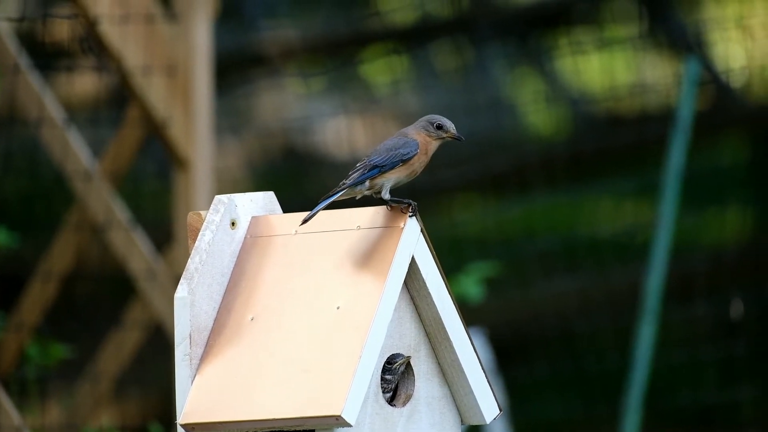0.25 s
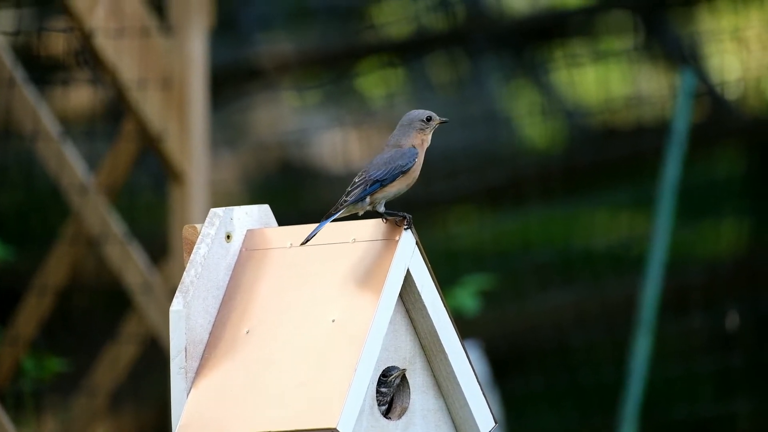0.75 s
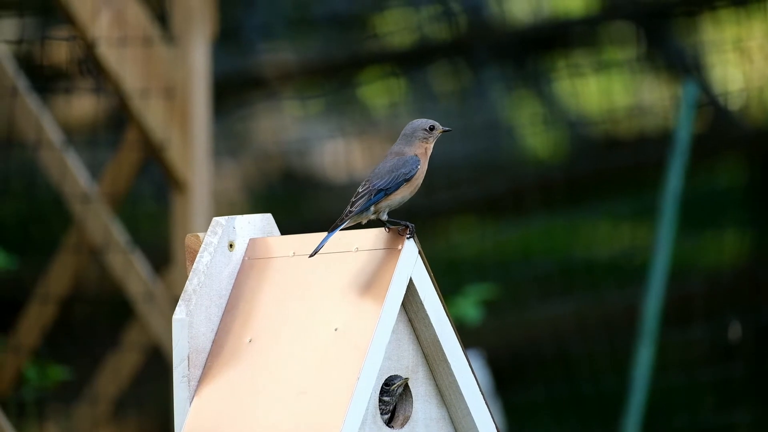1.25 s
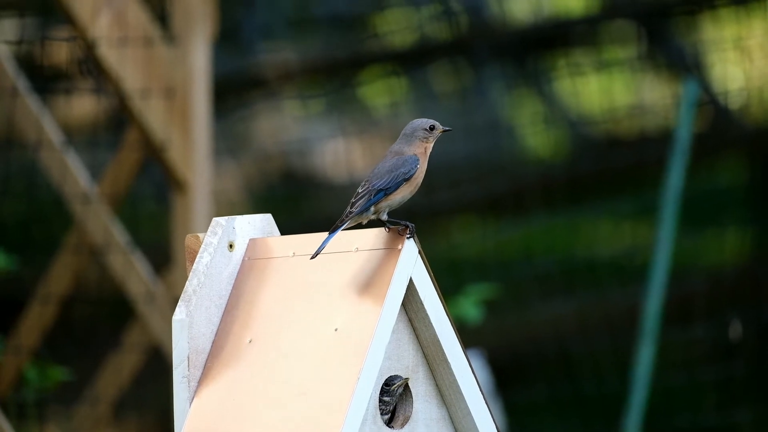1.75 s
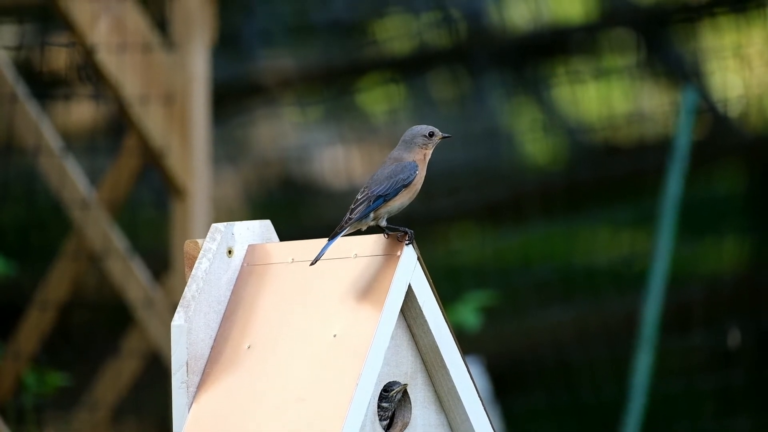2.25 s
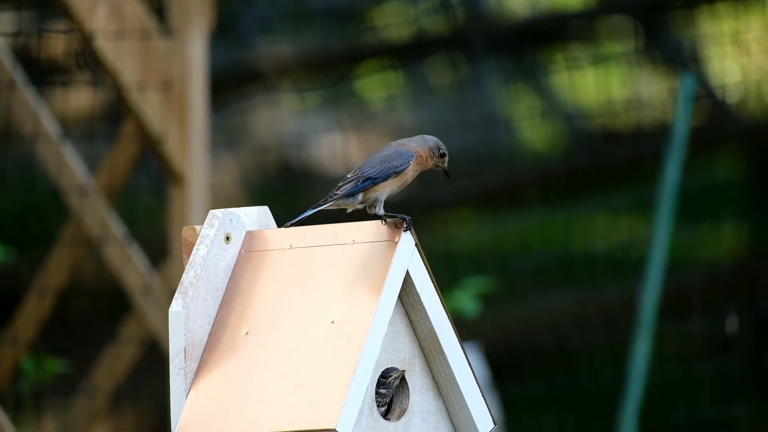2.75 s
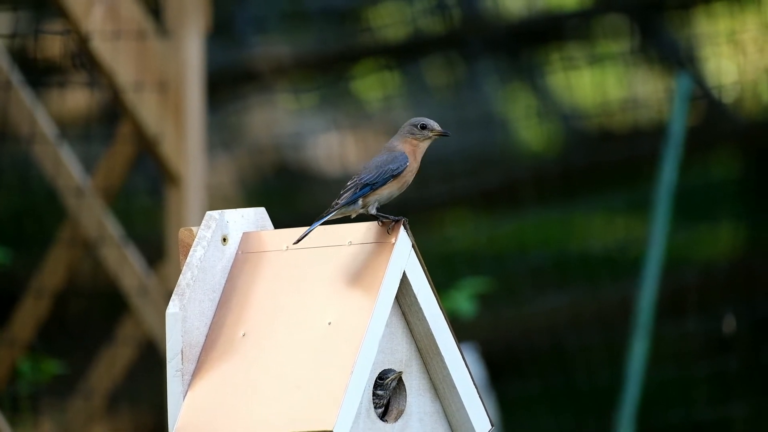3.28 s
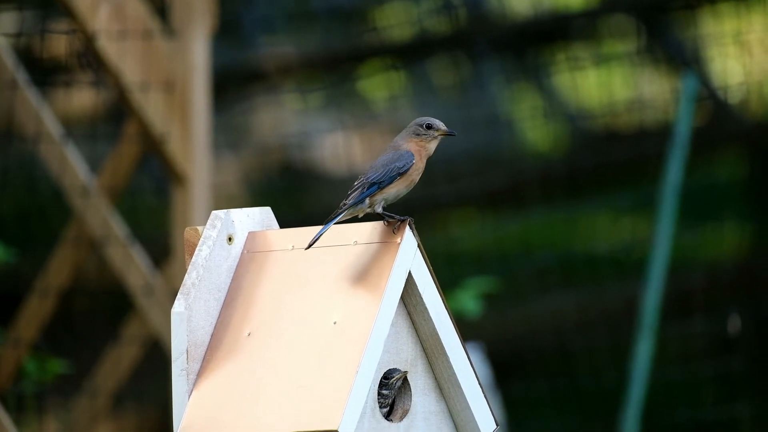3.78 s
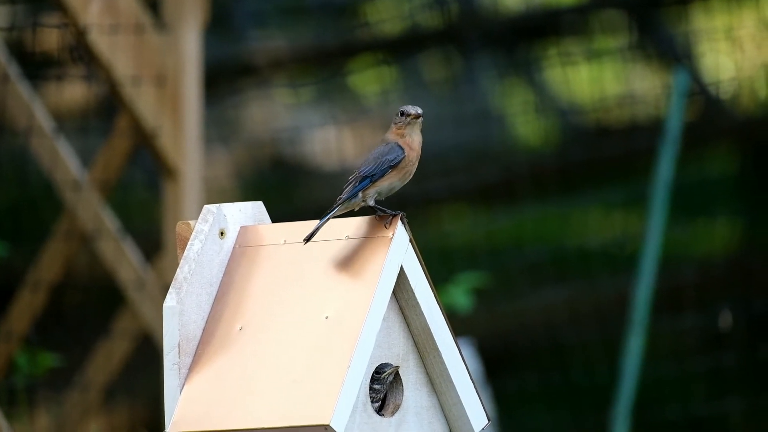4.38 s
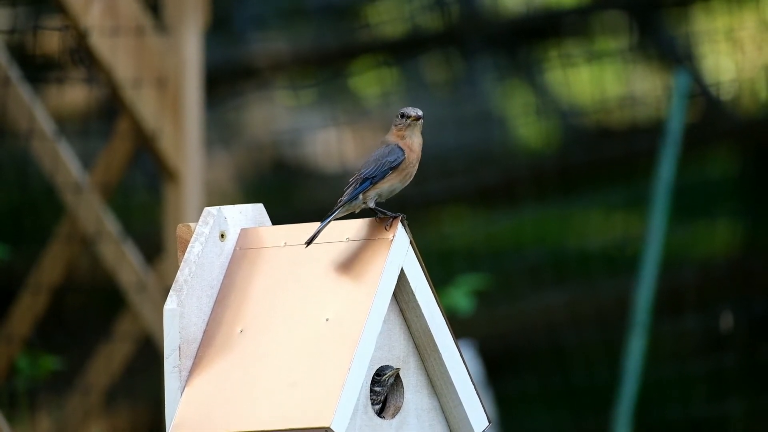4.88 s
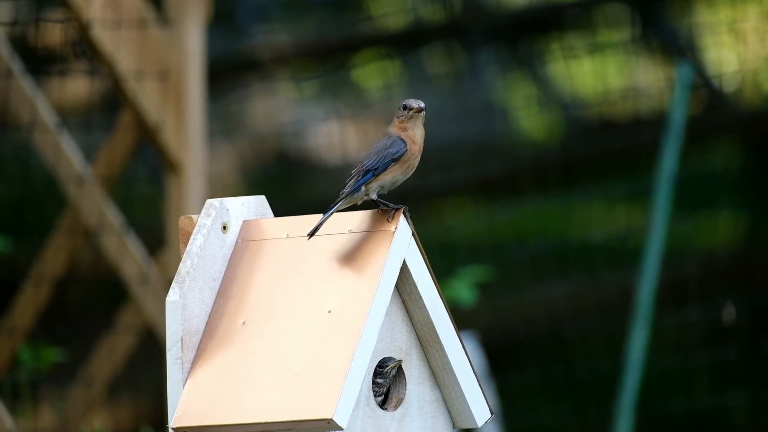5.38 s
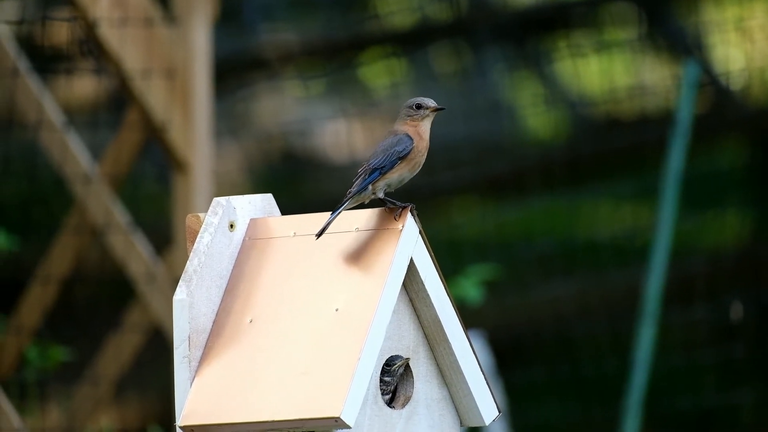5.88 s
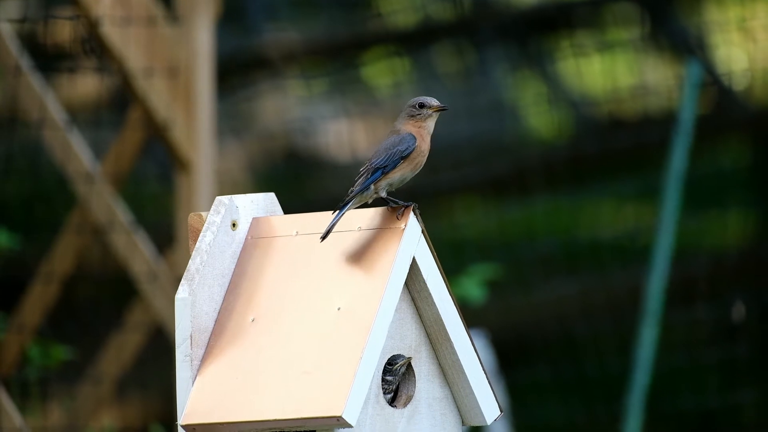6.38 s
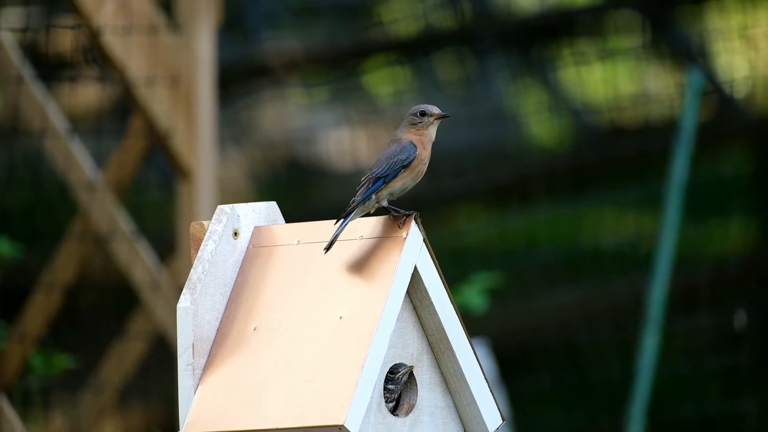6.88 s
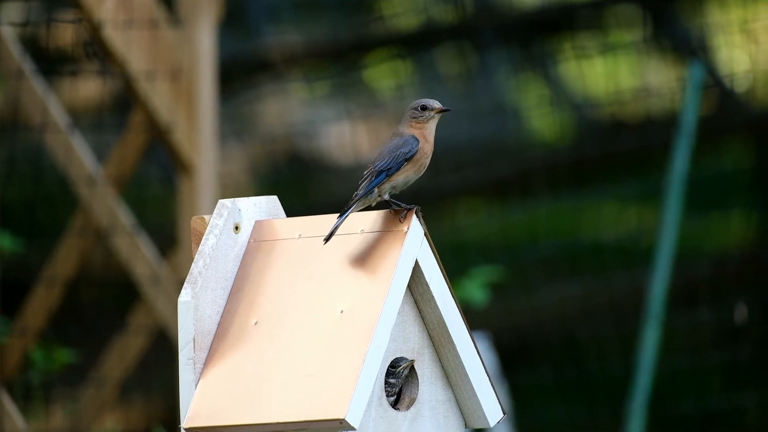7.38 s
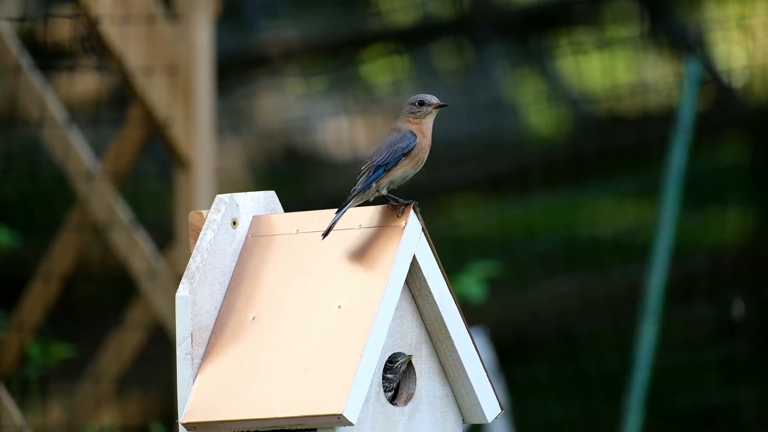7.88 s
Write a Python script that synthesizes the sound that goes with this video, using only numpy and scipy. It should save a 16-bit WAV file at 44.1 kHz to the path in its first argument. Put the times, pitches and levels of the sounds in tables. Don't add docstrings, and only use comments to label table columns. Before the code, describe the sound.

A small bluebird perched on a nest box opens with two harsh chucks and a strong falling whistle, then a soft broken reply. A sharp chip, more chucks and a lone whistle follow after gaps. The camera casing ticks twice, then a final run of chucks and fluttering whistles ends with a chip and faint knocks. Low traffic, air hiss and distant birds fill the leafy yard, heard through a handheld stereo microphone.

```python
import sys
import numpy as np
from scipy import signal
from scipy.fft import rfft, irfft, next_fast_len
from scipy.io import wavfile
from scipy.ndimage import uniform_filter1d, map_coordinates

SR = 44100
rng = np.random.default_rng(int(sys.argv[2]) if len(sys.argv) > 2 else 0)


def gain_from_db(level_db):
    decades = np.asarray(level_db, float) / 20
    return 10 ** decades


def generate_wav(signal):
    frames = np.transpose(np.atleast_2d(signal))
    scaled = np.clip(frames, -1, 1) * 32767
    pcm = np.round(scaled).astype(np.int16)
    wavfile.write(sys.argv[1], SR, pcm)


N = 358974
T = np.arange(N) / SR

# time [s], hum level [dB].
TRAFFIC = [(0.0, -51), (0.43, -55.5), (1.36, -51), (1.92, -52.5), (2.45, -49.5), (3.99, -51), (4.71, -43.5),
           (4.92, -48), (5.87, -50), (6.53, -48), (6.76, -51), (8.14, -50)]
# time [s], rumble gain [dB].
LORRIES = [
    (2.9, 2),
    (4.85, 2.5),
    (5.95, 5),
    (7.9, 5.5),
]
# frequency [Hz], level [dB per Hz].
RUMBLE = [(8.8, -61), (15, -16.5), (54, -1.5), (70, 2.5), (97, -7.5), (120, -9), (160, -57.5), (260, -120)]
# frequency [Hz], level [dB per Hz].
HUM = [(59, -50.5), (100, -3.5), (189, 2.5), (236, -3.5), (291, -12), (330, -30.5), (430, -23.5),
       (730, -120)]
# frequency [Hz], level [dB per Hz].
AIR = [(160, -37), (280, -2.5), (373, -2), (504, -5), (683, -9.5), (808, -7), (1110, -11.5), (1290, -13.5),
       (1780, -17), (2600, -18.5), (4500, -24.5), (5220, -26), (6080, -31.5), (15600, -43.5)]
# frequency [Hz], level [dB per Hz].
RUSTLE = [(2200, -40), (3000, 1), (4600, -3), (6000, -40)]
# frequency [Hz], left-right likeness [0 to 1].
ALIKE = [(25, 0.97), (60, 0.89), (130, 0.98), (290, 0.96), (640, 0.77), (1410, 0.3), (3100, 0.04),
         (6820, 0.057), (15000, 0.26)]
# frequency [Hz], time to fall 60 dB [s].
YARD = [(800, 0.22), (2500, 0.66), (7000, 0.56), (14000, 0.38)]

# start [s], peak level [dB], pitch [Hz].
THUDS = [
    (7.686, -37.5, 770),
    (7.743, -43, 1150),
    (7.888, -48, 850),
]
# start [s], length [s], level [dB].
DROPS = [
    (4.447, 0.032, -56),
    (5.433, 0.046, -62),
    (7.592, 0.077, -66),
    (7.628, 0.069, -58),
    (7.915, 0.055, -63),
    (7.955, 0.064, -54),
]
# start [s], level [dB].
TSEEPS = [
    (2.181, -68),
    (2.509, -69),
    (2.626, -62.5),
    (7.888, -71),
]
# start [s], level [dB].
PEEPS = [
    (2.13, -73),
    (3.24, -71),
    (4.35, -73),
    (5.39, -71.5),
    (6.384, -72),
]
# start [s], start pitch [Hz], level [dB].
WISPS = [
    (.18, 8000, -77),
    (5.94, 8470, -80),
    (7.1, 7900, -83),
]
# start [s], length [s], pitch [Hz], level [dB], pan [dB].
HELD = [(0.126, 0.032, 3090, -63.5, 1), (0.216, 0.024, 2444, -56, -5), (1.763, 0.036, 2570, -68, -2),
        (1.8, 0.03, 2340, -68, 5), (1.964, .02, 2770, -67, -1), (2.006, 0.13, 2270, -65, 1),
        (4.18, 0.036, 3750, -69, 2), (4.213, 0.085, 3540, -63, 0), (4.794, 0.083, 3970, -70, -6),
        (4.83, 0.023, 3010, -65, 0), (4.864, 0.013, 3500, -63.5, 0), (0.536, 0.05, 11400, -74, -4),
        (4.93, 0.024, 2410, -63, -5), (4.952, 0.016, 2990, -63, -2), (5.14, 0.029, 3360, -74, 0),
        (5.453, 0.15, 4370, -76.5, -6), (5.617, 0.077, 4360, -83, -3), (6.205, .035, 2307, -59, -1.5),
        (5.73, 0.053, 4170, -67, -7), (5.849, 0.097, 4130, -65.5, -3), (5.974, 0.032, 3150, -70, 9)]
# start [s], length [s], start pitch [Hz], end pitch [Hz], level [dB].
STROKES = [(0.095, 0.11, 4010, 3490, -70), (0.618, 0.035, 7000, 6350, -68), (0.655, 0.12, 6330, 6530, -63),
           (0.775, 0.07, 6600, 7000, -67), (1.949, 0.045, 6670, 5700, -67), (1.694, 0.043, 2750, 2426, -68),
           (1.85, 0.024, 2310, 2140, -68), (1.978, 0.02, 2730, 2400, -68), (2.156, 0.013, 2340, 3300, -63),
           (2.26, 0.043, 1890, 2700, -71), (2.379, 0.038, 2040, 2450, -66), (2.44, 0.041, 2330, 2130, -69),
           (2.504, 0.031, 2170, 2680, -66), (3.664, 0.024, 2100, 2290, -69),
           (3.688, 0.045, 2410, 2850, -60.5), (3.739, 0.017, 3170, 2810, -57),
           (4.239, 0.038, 2760, 2580, -63), (4.27, 0.13, 2550, 2270, -57.5),
           (4.88, 0.11, 3090, 3230, -70.5), (5.01, 0.11, 3265, 3240, -69.5),
           (5.471, 0.017, 3020, 2850, -56.5), (.16, 0.1, 3660, 3610, -74), (7.164, 0.019, 2010, 1690, -65),
           (7.25, 0.018, 1810, 2020, -70), (4.413, 0.048, 3380, 3050, -57.5),
           (5.566, 0.017, 2800, 3040, -58), (5.585, 0.012, 3060, 3460, -48.5),
           (5.593, 0.01, 3450, 3900, -63), (5.609, 0.014, 2500, 2410, -57), (5.62, 0.027, 2400, 3430, -57),
           (5.655, 0.019, 2480, 2560, -59), (5.673, 0.013, 2700, 3050, -56), (3.93, 0.017, 3100, 3230, -57),
           (3.962, 0.015, 3250, 3420, -64), (6.123, 0.033, 2330, 2670, -53.5),
           (6.147, .07, 2570, 2310, -63.5), (7.008, 0.059, 3210, 3020, -66),
           (7.289, 0.038, 3600, 3160, -70), (7.324, 0.047, 3150, 3000, -60.5)]

# start [s], level [dB], low ending level [dB], stretch [times].
SLURS = [
    (6.012, -71.5, -74, 1.24),
    (6.335, -71, -76, 1.2),
    (6.66, -69, -74, 1),
    (6.994, -70.5, -85, 0.99),
    (7.32, -69, -68, 1.02),
    (7.649, -67.5, -63, 0.95),
    (7.98, -69.5, -78, 0.96),
]
# time [s], pitch [Hz], level [dB].
SLUR = [(0, 6720, -9), (.03, 4594, 2), (.06, 3860, 9), (.115, 3200, 9.5), (.15, 2960, -4)]
# time [s], pitch [Hz], level [dB].
ENDING = [(.153, 2550, 0), (.175, 1780, 2), (.2, 1520, -2), (.235, 1490, 1), (.29, 1800, 3)]
# time of lowest pitch [s], drop [s], lowest pitch [Hz], climb [s], level [dB].
SCOOPS = [
    (4.775, 0.0041, 1697, 0.29, -64),
    (5.541, 0.072, 1702, .28, -60.5),
    (6.097, .055, 2230, 0.032, -59),
]
# share of the time [0 to 1], share of the rise [0 to 1], level [dB].
CLIMB = [(0, 0, -3), (.33, .25, 4), (.5, .35, -1), (.72, .62, -2), (.86, .84, 3), (.95, .96, 7), (1, 1, 4)]
# start [s], peak level [dB], pitch [Hz], pan [dB].
HOOTS = [
    (0.17, -56, 832, -4.5),
    (0.475, -53.5, 902, -2),
    (0.805, -54.5, 898, -4),
    (0.861, -60, 780, -8),
    (0.992, -55.5, 793, -8),
    (6.575, -56, 822, -5.5),
    (6.81, -53, 885, -4),
]
# start [s], length [s], lowest pitch [Hz], end pitch [Hz], level [dB].
HOOKS = [
    (0.376, 0.1, 7200, 9300, -61.5),
    (0.575, 0.12, 7450, 8500, -70),
    (0.838, 0.068, 7450, 8400, -60),
    (1.343, 0.064, 6920, 8650, -58.5),
    (1.626, 0.05, 7160, 7800, -75),
    (1.919, 0.063, 7000, 8600, -54),
    (2.447, 0.068, 7500, 8640, -69),
    (3.409, 0.11, 7100, 10200, -53.5),
    (5.099, 0.11, 6900, 9800, -58.5),
    (6.874, 0.11, 7020, 9970, -53),
]

# start [s], peak level [dB], brightness [dB].
TICKS = [
    (5.054, -36, 24),
    (5.218, -23, -13),
]
# frequency [Hz], width [Hz], level [dB].
CASING = [(330, 470, 15), (750, 200, 0), (1530, 4900, 13.5), (5400, 1400, 7), (7500, 1600, 1),
          (11700, 3000, -14.5)]

# start [s], level [dB], start pitch [Hz], end pitch [Hz], pan [dB].
CHIPS = [
    (1.705, -39.5, 4900, 9160, 0),
    (4.05, -39.5, 5240, 8690, 0.5),
    (7.329, -38.5, 5120, 8540, 1),
]
# time of highest pitch [s], level [dB], highest pulse rate [Hz], half length [s].
CHUCKS = [
    (0.331, -34.5, 920, 0.021),
    (0.4, -34.5, 1046, 0.021),
    (2.71, -38, 902, 0.02),
    (2.766, -34.5, 1066, 0.019),
    (3.317, -38, 884, .022),
    (6.255, -35, 938, 0.023),
    (6.352, -32, 1136, 0.019),
]
# frequency [Hz], level [dB].
THROAT = [(1200, -25), (1750, -5.5), (2350, -3), (2800, 3.5), (3600, -1), (5000, -11.5), (6200, -31.5),
          (8000, -32.5), (11000, -30.5), (13500, -69.5)]
ORDER_DB = [-23.5, -11.5, -1.5, -3, -2, 2.5, 3.5, -1, -4]

# time [s], level [dB].
WHISTLES = [
    [(.505, -57), (.515, -53), (.538, -30.5), (.569, -27.5), (.636, -34.5), (.648, -41.5), (.659, -36),
     (.67, -48), (.682, -38), (.723, -42.5), (.742, -49)],
    [(.827, -69), (.837, -47), (.853, -43.5), (.871, -56.5), (.893, -36.5), (.901, -47), (.913, -37),
     (.943, -46), (.952, -46)],
    [(3.79, -52), (3.814, -35), (3.852, -30), (3.916, -31.5), (3.958, -43), (3.966, -34), (4.014, -41.5),
     (4.04, -41), (4.05, -51)],
    [(6.415, -50), (6.427, -45.5), (6.469, -29), (6.507, -28), (6.534, -34), (6.55, -29), (6.568, -41),
     (6.578, -37.5), (6.592, -40.5), (6.611, -33.5), (6.636, -44)],
    [(6.713, -66), (6.721, -47), (6.743, -43.5), (6.775, -34.5), (6.787, -47), (6.797, -37), (6.835, -35),
     (6.85, -51)],
    [(6.9, -54), (6.908, -51), (6.918, -40), (6.942, -37.5), (6.97, -44), (6.992, -39), (7.012, -53)],
]
# time [s], pitch [Hz].
GLIDES = [
    [(.505, 2860), (.538, 2875), (.57, 2700), (.638, 2510), (.68, 2370), (.722, 2200), (.75, 2170)],
    [(.827, 2490), (.87, 2440), (.9, 2360), (.93, 2270), (.955, 2210)],
    [(3.79, 2810), (3.82, 2780), (3.852, 2675), (3.92, 2545), (3.96, 2390), (4.014, 2150), (4.05, 2100)],
    [(6.415, 2650), (6.428, 2980), (6.468, 2757), (6.51, 2603), (6.56, 2505), (6.6, 2390), (6.64, 2290)],
    [(6.713, 2540), (6.735, 2480), (6.78, 2435), (6.8, 2375), (6.835, 2260), (6.855, 2190)],
    [(6.9, 2020), (6.914, 2290), (6.935, 2325), (6.95, 2260), (6.972, 2105), (7.015, 2090)],
]
FACING_US_DB = [-1, 0, 1, 1, 3, -1]
# pitch [Hz], level [dB].
SECOND = [(2150, -59), (2400, -67), (2620, -71), (2860, -87)]
# frequency [Hz], level [dB].
BEAK = [(6500, -2), (8200, -4), (9300, 5), (10800, 5.5), (12500, 3), (14000, -1), (15700, -10)]
# pitch [Hz], pan [dB].
SHADOW = [(2120, 0.5), (2300, -2.5), (2450, -11.5), (2560, -3.5), (2700, -2), (2900, -3.5)]


def unit(x):
    return x / np.sqrt(np.mean(x ** 2) + 1e-20)


def along(points, hz):
    f, v = np.transpose(points)
    return np.interp(np.log(hz + 1), np.log(f + 1), v)


def wobble(rate, size=N):
    knots = rng.standard_normal(int(size * rate / SR) + 4)
    return map_coordinates(knots, [np.arange(size) * rate / SR])


def filtered(x, response):
    m = next_fast_len(N + 8192)
    return irfft(rfft(x, m) * response(np.fft.rfftfreq(m, 1 / SR)), m)[..., :N]


def resonance(hz, centre, width):
    return 1j * hz * width / (centre ** 2 - hz * hz + 1j * hz * width)


def late(x, lag_s):
    return filtered(x, lambda hz: np.exp(-1j * np.pi * hz * lag_s * np.array([[1], [-1]])))


def add(track, s, sound, pan_db=0):
    room = track[:, round(s * SR):][:, :len(sound)]
    gains = gain_from_db(np.multiply.outer([.5, -.5], pan_db + np.zeros(len(sound))))
    room += (sound * gains)[:, :room.shape[1]]


def note(rows, fade=0.0019, bend=0.01):
    s, hz, *cols = np.transpose(rows)
    t = np.arange(s[0], s[-1], 1 / SR)
    pitch = uniform_filter1d(np.interp(t, s, hz), 1 + int(bend * SR), mode="nearest")
    phase = 2 * np.pi * np.cumsum(pitch) / SR
    ends = np.sqrt(2) * np.clip(np.minimum(t - s[0], s[-1] - t) / fade, 0, 1)
    return phase, ends, [np.interp(t, s, c) for c in cols]


def echoes(x, gap=0.0049, slower=1):
    hz, t, z = signal.stft(rng.standard_normal((2, SR)), SR, nperseg=256)
    decay = gain_from_db(-60 * t / (slower * along(YARD, hz)[:, None]))
    tail = signal.istft(z * decay, SR, nperseg=256)[1]
    tail = np.pad(tail / np.linalg.norm(tail[0]), ((0, 0), (round(gap * SR), 0)))
    return signal.fftconvolve(x, tail, axes=1)[:, :N]


def fence(x):
    delays_s = 0.014 * np.array([[1], [1.1]])
    return filtered(x, lambda hz: np.exp(-2j * np.pi * hz * delays_s))


def rush(spectrum, patchy_db):
    z = signal.stft(rng.standard_normal((2, N + 512)), nperseg=512)[2]
    field = uniform_filter1d(rng.standard_normal(z.shape[1:]), size=6, axis=0)
    field = uniform_filter1d(field, size=14, axis=1)
    pair = signal.istft(z * gain_from_db(patchy_db * unit(field)), nperseg=512)[1][:, :N]

    def colour(hz):
        turn = np.arccos(np.clip(along(ALIKE, hz), -1, 1)) / 2
        return gain_from_db(along(spectrum, hz)) * [np.cos(turn), np.sin(turn)]

    mid, side = filtered(pair, colour)
    return np.array([mid + side, mid - side]) / np.std(mid)


def yard():
    hum_db = np.interp(T, *np.transpose(TRAFFIC))
    swell_db = hum_db - hum_db.mean()
    pass_s = 0.34
    passes_db = sum(db * np.exp(-((T - s) / pass_s) ** 2) for s, db in LORRIES)
    rumble = gain_from_db(-54.5 + passes_db + 0.59 * wobble(2.1)) * rush(RUMBLE, patchy_db=1.7)
    hum = gain_from_db(hum_db + 1.4 + 0.68 * wobble(5)) * rush(HUM, patchy_db=0.55)
    stir_s, stir_lasts_s = 0.72, .4
    stir_db = -69.5 - 9 * ((T - stir_s) / stir_lasts_s) ** 2
    stir = gain_from_db(stir_db) * rush(RUSTLE, patchy_db=0.5)
    air = gain_from_db(-54.5 + 0.038 * swell_db) * rush(AIR, patchy_db=1.2)
    return stir + rumble + hum + air


def insect():
    hz, db = 4640, -81.5
    drift = 1.5 * np.array([wobble(30), wobble(30)])
    return gain_from_db(db + 3 * wobble(25) + wobble(2)) * np.sin(2 * np.pi * hz * T + drift)


def far_notes():
    drops = [(s, length, 3180, 2340, db, 2.5) for s, length, db in DROPS]
    tseeps = [(s, 0.0242, 4300, 3650, db, -1.5) for s, db in TSEEPS]
    peeps = [(s, 0.036, 6380, 6400, db, -2.5) for s, db in PEEPS]
    wisps = [(s, .09, hz, hz * (1 - 0.052), db, -8) for s, hz, db in WISPS]
    held = [(s, length, hz, hz * (1 - 0.0179), db, pan) for s, length, hz, db, pan in HELD]
    return drops + tseeps + peeps + wisps + held + [(*row, -0.6) for row in STROKES]


def twitter():
    out = np.zeros((2, N))
    for s, length, start_hz, end_hz, db, pan in far_notes():
        phase, ends, _ = note([(s, start_hz), (s + length, end_hz)], fade=0.0012, bend=.004)
        broken = gain_from_db(db + 2.0 * wobble(63.5, len(phase)))
        add(out, s, ends * broken * np.sin(phase + 1.1 * wobble(110, len(phase))), pan)
    t = np.arange(0, .02, 1 / SR)
    for s, db, hz in THUDS:
        decay = gain_from_db(db - 60 * t / 0.057) * np.clip(t / 0.002, 0, 1)
        add(out, s - .003, decay * np.sin(2 * np.pi * hz * t + 1.9 * wobble(540, len(t))))
    return out + gain_from_db(-.3) * echoes(out, slower=1.3)


def slurs(out):
    for s, db, ending_db, stretch in SLURS:
        for rows, level_db in (np.multiply(SLUR, [stretch, 1, 1]), db), (ENDING, ending_db):
            phase, ends, (shape_db,) = note(rows)
            start = s + rows[0][0]
            if start < T[-1]:
                level = gain_from_db(level_db + shape_db + 2.5 * wobble(60, len(phase)))
                add(out, start, ends * level * np.sin(phase), pan_db=1.0)


def scoops(out):
    drop_hz_per_s, climb_hz_per_s = 19500, 2900
    for s, drop, low_hz, climb, db in SCOOPS:
        fall, rise = drop_hz_per_s * drop, climb_hz_per_s * climb
        rows = [(s - drop, low_hz + fall, 3),
                (s - drop / 2, low_hz + .36 * fall, 0)]
        rows += [(s + when * climb, low_hz + share * rise, d) for when, share, d in CLIMB]
        phase, ends, (shape_db,) = note(rows, fade=0.0023, bend=0.018)
        level = gain_from_db(db + shape_db + 2.5 * wobble(50, len(phase)))
        add(out, s - drop, ends * level * np.sin(phase), pan_db=-1.5)


def hoots(out):
    length = .045
    t = np.arange(0, length, 1 / SR)
    for s, db, hz, pan in HOOTS:
        swell = np.sin(np.pi * t / length) ** 1.05
        add(out, s, gain_from_db(db + 5.5) * swell * np.sin(2 * np.pi * hz * t), pan)


def singers():
    out = np.zeros((2, N))
    slurs(out)
    scoops(out)
    hoots(out)
    return out + gain_from_db(-5.5) * echoes(out, slower=0.84)


def hooks():
    near, far = np.zeros((2, N)), np.zeros((2, N))
    for s, length, low_hz, end_hz, db in HOOKS:
        t = np.arange(0, length, 1 / SR)
        bottom = low_hz - 250
        hz = bottom + 3600 * np.exp(-t / 0.0088) + (end_hz - bottom) * (t / length) ** 1.8
        level = gain_from_db(1.4 * wobble(97, len(t)) - 4.6 * (hz - low_hz) / 1000)
        swell = np.sin(np.pi * t / length) ** 0.15
        phase = 2 * np.pi * np.cumsum(hz) / SR + 0.62 * wobble(150, len(t))
        tone = level * swell * np.sin(phase)
        add(near, s, gain_from_db(db) * tone, pan_db=8.5)
        echo_db = -62 - 0.49 * (db + 63)
        add(far, s, gain_from_db(echo_db) * tone, pan_db=-1.0)
    return near + echoes(far)


def ticks():
    out = np.zeros((2, N))
    contacts = ((1, .0011, .6), (1, .00145, -1), (1, .0018, .7), (1, .0036, .1),
                (0, .0012, .35), (0, .0016, -.6), (0, .0021, .35))
    for s, db, bright_db in TICKS:
        blow = np.zeros((2, N))
        for port, lag, size in contacts:
            blow[port, round((s + lag) * SR)] += size * gain_from_db(db + 7.5)

        def case(f):
            modes = sum((-1) ** k * gain_from_db(d + bright_db * c / 8000) * resonance(f, c, w)
                        for k, (c, w, d) in enumerate(CASING))
            return modes / (1 + 1j * f / 7500) ** 4

        out += filtered(blow, case)
    t = np.arange(0, .03, 1 / SR)
    for (s, *_), hz, db in zip(TICKS, [820, 456], [-37.5, -32.5]):
        add(out, s + 0.00339, gain_from_db(db - 60 * t / 0.019) * np.sin(2 * np.pi * hz * t))
    return out


def chips():
    out = np.zeros((2, N))
    for s, db, start_hz, end_hz, pan in CHIPS:
        middle_hz = .5 * start_hz + .5 * end_hz
        rows = [(s, start_hz, -2), (s + 0.0047, middle_hz, 0), (s + 0.011, end_hz, -7)]
        phase, ends, (shape_db,) = note(rows, fade=0.0018, bend=0.0026)
        overtone_db = -17.0 - 11 * np.abs(np.linspace(-1, 1, len(phase)))
        tone = np.sin(phase) + gain_from_db(overtone_db) * np.sin(2 * phase)
        add(out, s, ends * gain_from_db(db + shape_db) * tone, pan)
    out = late(out, 3e-5)
    return out + gain_from_db(1.5) * echoes(out, gap=0.0015, slower=0.22) + gain_from_db(-4.5) * echoes(out, gap=0.008, slower=0.89)


def chucks():
    out, k = np.zeros((2, N)), np.arange(1, 26)[:, None]
    order_db = np.pad(ORDER_DB, (0, len(k) - len(ORDER_DB)))[:, None]
    for s, db, top_hz, half in CHUCKS:
        u = np.arange(-1.2 * half * SR, .6 * half * SR) / (half * SR)
        leap = np.exp(-(np.abs(u) / np.where(u < 0, .73, .5)) ** 1.7)
        rate = top_hz * (.4 + .6 * leap) * (1 + .013 * wobble(500, len(u)))
        uneven_db = 1.7 * np.array([wobble(250, len(u)) for _ in k])
        dull_db = -11 * np.abs(u + 0.22) * np.clip(k * rate / 1000 - 3.5, 0, 3)
        level = gain_from_db(along(THROAT, k * rate) + order_db + uneven_db + dull_db)
        stack = level * np.sin(2 * np.pi * k * np.cumsum(rate) / SR + k * k * 0.412)
        swell = gain_from_db(np.where(u < 0, -23, -66) * u * u) * np.clip(8 * (u - u[0]), 0, 1)
        rasp = gain_from_db(2.1 * wobble(900, len(u)))
        add(out, s - 1.2 * half, gain_from_db(db) * swell * rasp * stack.sum(0), pan_db=-1.2)
    core = filtered(out, lambda hz: resonance(hz, 2900, 1200))
    out = out + gain_from_db(-7.5) * fence(core)
    return out + gain_from_db(-7.0) * echoes(out, gap=0.0033, slower=0.15) + gain_from_db(-12.0) * echoes(out, gap=0.015, slower=0.84)


def whistles():
    out, thin = np.zeros((2, N)), np.zeros((2, N))
    sags_hz, sag_s = (0, 80, 0, 190, 150, 0), .009
    for rows, glide, sag_hz, facing_db in zip(WHISTLES, GLIDES, sags_hz, FACING_US_DB):
        times, db = np.transpose(rows)
        s, t = times[0], np.arange(0, times[-1] - times[0] + 0.002, 1 / SR)
        left = t[-1] - t
        pitch = uniform_filter1d(np.interp(s + t, *np.transpose(glide)), size=500, mode="nearest")
        pitch = pitch - sag_hz * np.exp(-left / sag_s)
        voice_db = uniform_filter1d(np.interp(s + t, times, db), size=200, mode="nearest")
        phase = 2 * np.pi * np.cumsum(pitch) / SR + .08 * wobble(70, len(t))
        ends = np.sqrt(2) * np.clip(np.minimum(t, left) / 0.0011, 0, 1)
        late_db = -31.5 * np.exp(-t / 0.018)

        def partial(order, level_db, waver_db):
            return gain_from_db(level_db + waver_db * wobble(67.0, len(phase))) * np.sin(order * phase)

        flutter_db = 1.1 * np.sin(2 * np.pi * 62 * t + 1.5 * wobble(25, len(t)))
        first = partial(1, voice_db + flutter_db, waver_db=1.37)
        second_db = along(SECOND, pitch) - 5 + .6 * late_db - 15 * np.exp(-left / .01)
        second = partial(2, second_db, waver_db=4)
        add(out, s, ends * (first + second), pan_db=along(SHADOW, pitch))
        follow_db = 0.59 * (uniform_filter1d(voice_db, size=1500) + 28.0)
        upper_db = -72 + facing_db + follow_db + late_db - 20 * np.exp(-left / .012)
        upper = sum(partial(k, upper_db + along(BEAK, k * pitch), waver_db=2) for k in (3, 4, 5, 6))
        add(thin, s, ends * upper, pan_db=1.0)
    out = late(out, -0.000027) + late(thin, 2.5e-5)
    roof = gain_from_db(-7.5) * echoes(thin, gap=.01, slower=.5)
    wall = gain_from_db([[-14], [-15]]) * echoes(out, gap=.005, slower=0.53)
    trees = gain_from_db([[-19.5], [-20]]) * echoes(out, gap=0.07, slower=1.1)
    return out + gain_from_db(-13) * fence(out) + roof + wall + trees


def scene():
    background = yard() + insect() + twitter() + singers() + hooks()
    return background + ticks() + chips() + chucks() + whistles()


def roll_off(x):
    return signal.sosfilt(signal.butter(12, 15740, fs=SR, output="sos"), x)


def record(dry):
    return roll_off(dry)


dry = scene()
out = record(dry)
generate_wav(out)
```